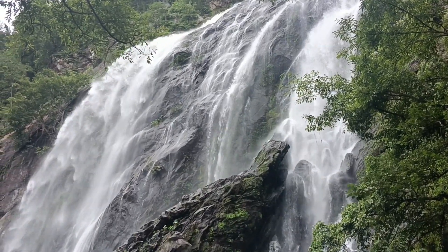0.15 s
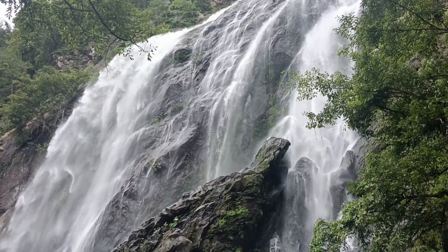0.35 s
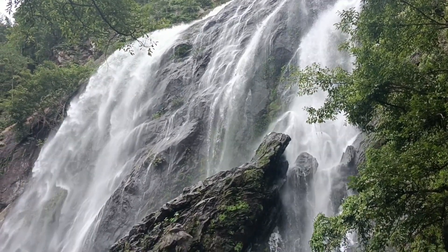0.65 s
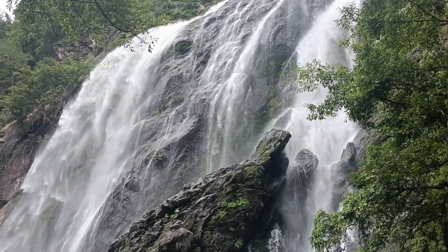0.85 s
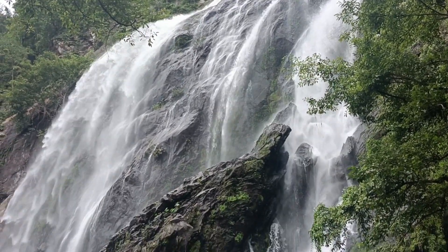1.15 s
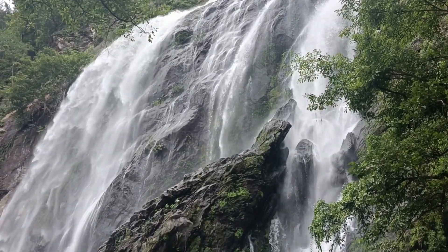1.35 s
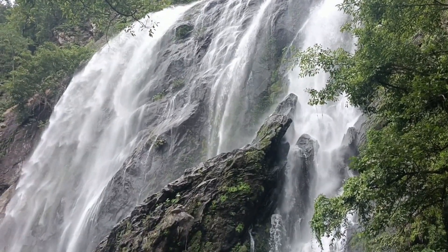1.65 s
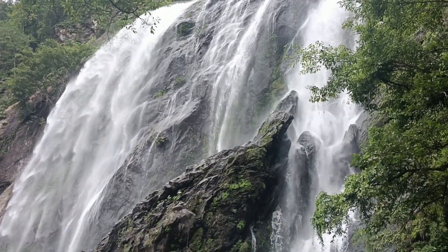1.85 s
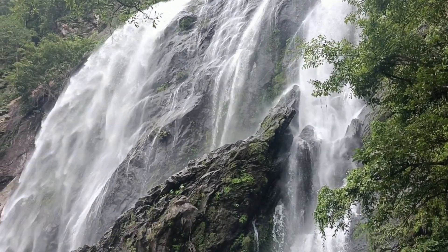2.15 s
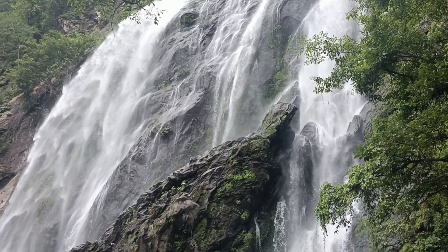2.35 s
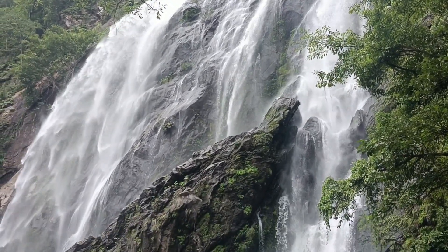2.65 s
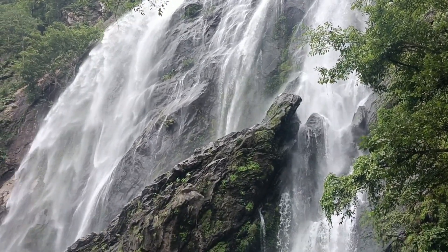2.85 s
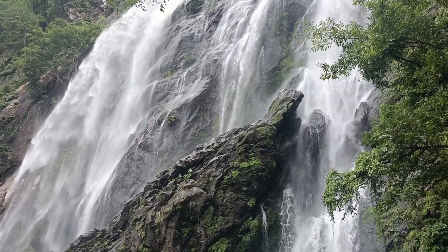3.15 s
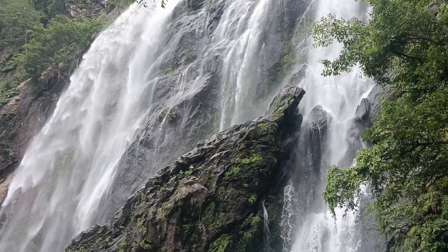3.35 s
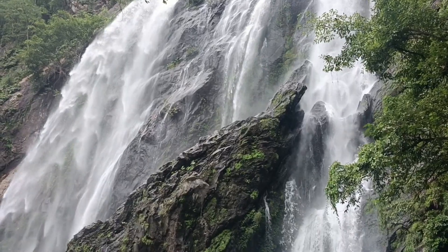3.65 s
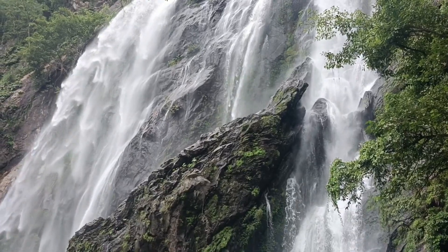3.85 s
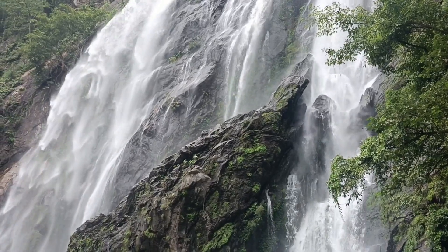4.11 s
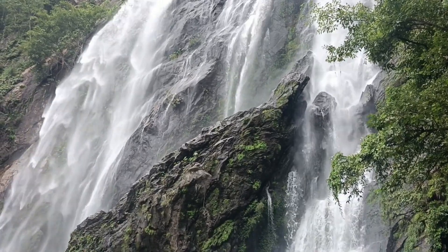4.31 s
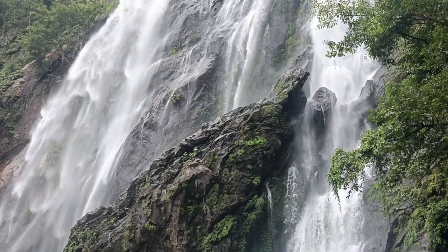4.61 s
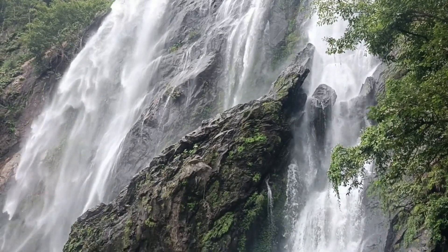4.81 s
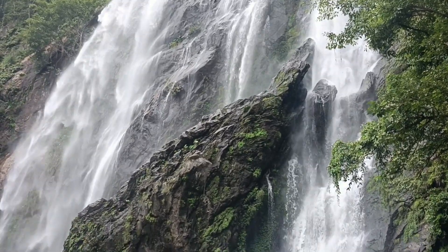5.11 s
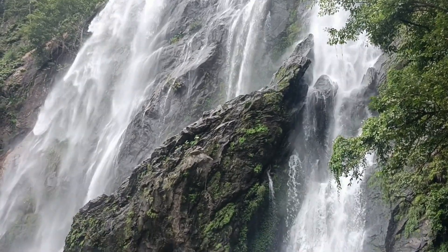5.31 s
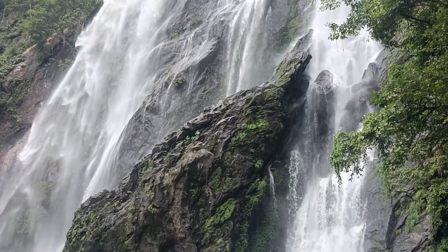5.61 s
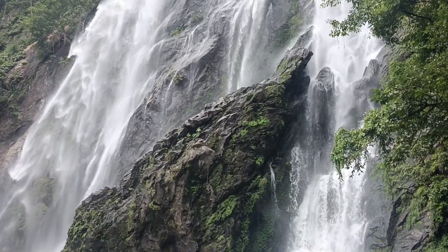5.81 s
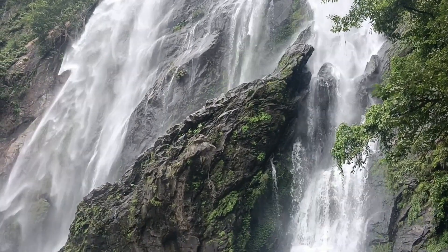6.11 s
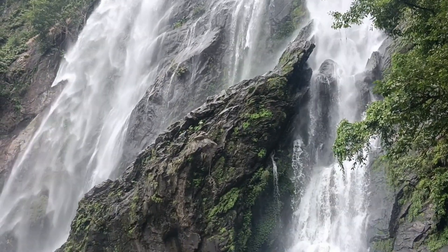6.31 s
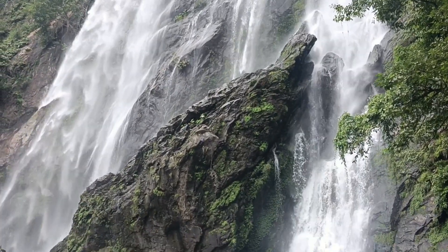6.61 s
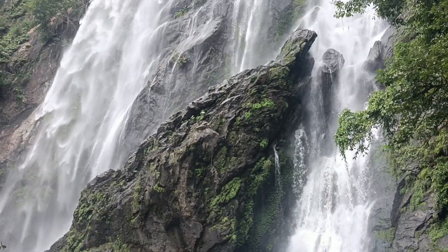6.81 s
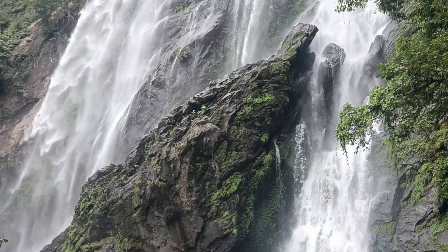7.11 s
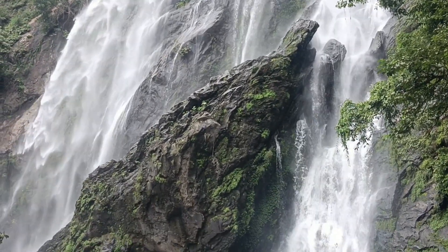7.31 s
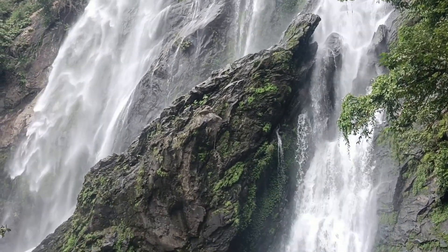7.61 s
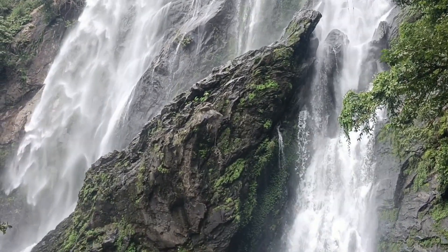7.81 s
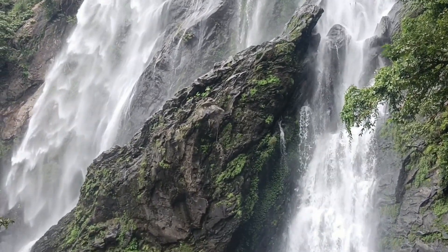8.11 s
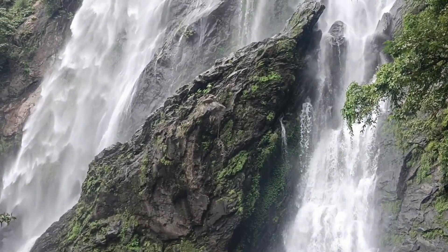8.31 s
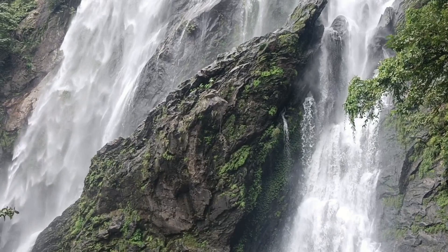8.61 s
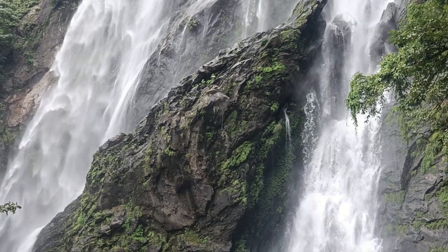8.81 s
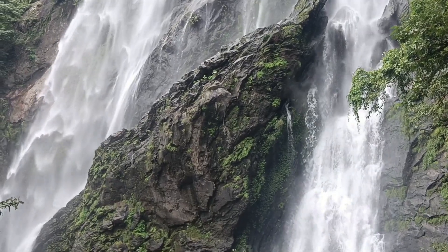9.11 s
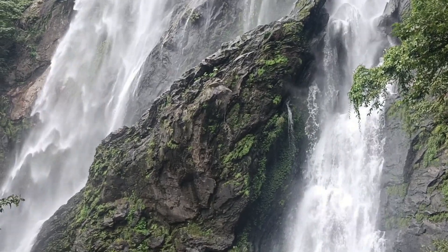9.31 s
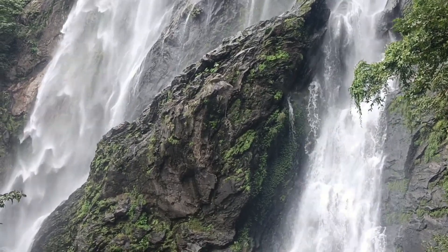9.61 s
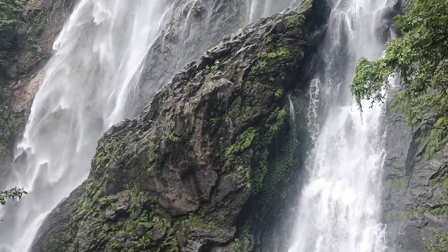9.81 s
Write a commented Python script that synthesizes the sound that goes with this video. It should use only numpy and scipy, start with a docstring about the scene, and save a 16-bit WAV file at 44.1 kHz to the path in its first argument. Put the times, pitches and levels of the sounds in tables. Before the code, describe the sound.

Continuous, slightly grainy hiss and roar of a big waterfall pouring over rock, with light wind thumps on the microphone.

```python
"""A steady rush of countless splashes: a tall waterfall heard from across its pool.
Heavy plunges of water make a low roar whose lower edge swells and sinks; fine spray makes the hiss.
Light gusts thump on the microphone, whose two openings (ports) colour the treble differently.
Its noise suppressor makes the rush sound grainy."""
import sys
import numpy as np
from scipy import signal
from scipy.fft import rfft, irfft, next_fast_len
from scipy.io import wavfile
from scipy.ndimage import uniform_filter1d

SR = 44100
rng = np.random.default_rng(int(sys.argv[2]) if len(sys.argv) > 2 else 0)


def bounce(signal):
    """Save signal as a 16-bit WAV file at the path given by the first command-line argument."""
    frames = np.transpose(np.atleast_2d(signal))
    limited = np.clip(frames, -1, 1)
    pcm = np.round(limited * 32767).astype(np.int16)
    wavfile.write(sys.argv[1], SR, pcm)


N = 438794
SIZE = 32 * next_fast_len(N // 32 + 1, True)   # a little over N samples, for quick spectra
HZ = np.maximum(np.fft.rfftfreq(SIZE, 1 / SR), 1)

# Tone of the water at both ports, up to the low treble: pitch_hz, relative_db
WATER_TONE = [(110, -86.5), (190, -78), (250, -75), (295, -59.5), (330, -58), (390, -66.5), (490, -59.5),
              (570, -58), (650, -59), (760, -64.5), (930, -61.5), (1100, -65.5), (1300, -62.5)]


def from_db(db):
    """Turn decibels into a gain."""
    return 10 ** (np.asarray(db) / 20)


def centre_one(pair):
    """Scale a stereo pair so that the average of its two sides has level (rms) 1."""
    return pair / np.sqrt(np.mean(pair.mean(axis=0) ** 2))


def colour(points):
    """A gain for every pitch in HZ, from rows of pitch_hz, level_db."""
    hz, db = np.transpose(points)
    return from_db(np.interp(np.log(HZ), np.log(hz), db))


def drift(rate_hz, size=N):
    """A slow random wander of typical size 1, made by smoothing noise twice."""
    decay = np.exp(-2 * np.pi * rate_hz * 64 / SR)
    noise = rng.standard_normal(SIZE // 64 + 1000)
    slow = signal.lfilter([1], [1, -2 * decay, decay * decay], noise)[1000:]
    slow /= np.sqrt(np.mean(slow ** 2))
    return np.interp(np.linspace(0, len(slow) - 1, size), np.arange(len(slow)), slow)


def arch(start_s, length_s):
    """A smooth rise from 0 to 1 and back."""
    return np.sin(np.pi * np.clip((np.arange(N) / SR - start_s) / length_s, 0, 1))


def noise_suppressor(sound):
    """In each short frame, pitches weaker than their running average go down and stronger ones go up."""
    hop, pad = 441, 592   # samples; a new frame starts every 10 ms
    contrast, spared_hz = 0.37, 296   # strength of the grain; the bass gets none
    memory_frames, carry_over = 35, 0.28
    padded = np.pad(sound, ((0, 0), (pad, 3 * hop)), "reflect")
    frames = np.lib.stride_tricks.sliding_window_view(padded, 2 * hop, axis=1)[:, ::hop]
    spectra = rfft(frames)
    power = np.abs(spectra) ** 2 + 1e-20
    recent = signal.lfilter([1 - carry_over], [1, -carry_over], power, axis=1)
    average = uniform_filter1d(power, memory_frames, axis=1)
    hz = np.fft.rfftfreq(2 * hop, 1 / SR)
    gain = (recent / average) ** (contrast * np.clip(hz / spared_hz - 1, 0, 1))
    gain *= np.sqrt(power.mean(axis=1) / (power * gain ** 2).mean(axis=1))[:, None]   # keep mean power
    fade = np.hanning(2 * hop + 1)[:-1] ** 1.104   # dips a little where two frames cross
    faded = irfft(spectra * gain, 2 * hop) * fade
    joined = faded[:, 1:, :hop] + faded[:, :-1, hop:]
    return joined.reshape(2, -1)[:, pad - hop:pad - hop + N]


def wind(alike, calm_db):
    """Air presses on both ports nearly alike: a faint rumble, and puffs that push firmly."""
    # Puffs of wind that thump on the ports: start_s, length_s, level_db
    gusts = [(0.129, 0.047, -61), (0.185, 0.037, -60), (0.237, 0.055, -58), (0.497, 0.055, -54),
             (0.666, 0.039, -57), (0.977, 0.029, -63), (1.265, 0.059, -63), (1.638, 0.041, -61),
             (1.682, 0.043, -62), (3.018, 0.037, -58), (3.356, 0.031, -61), (4.174, 0.063, -59),
             (4.354, 0.051, -60), (4.455, 0.062, -58), (5.112, 0.051, -60), (5.437, 0.043, -62),
             (5.697, 0.137, -58), (5.846, 0.041, -62), (6.601, 0.091, -57), (6.702, 0.096, -55),
             (6.808, 0.061, -55), (7.105, 0.035, -58), (7.147, 0.037, -64), (7.185, 0.147, -61),
             (7.433, 0.17, -54), (7.622, 0.035, -59), (7.726, 0.081, -52), (8.321, 0.091, -53),
             (8.578, 0.19, -58), (9.029, 0.033, -66), (9.113, 0.043, -62), (9.486, 0.29, -57)]
    # Deep tone of the wind: pitch_hz, relative_db
    gust_tone = [(18, -6), (35, -10), (56, 5.5), (85, -6.5), (130, -4.5), (250, -56)]
    mid, side = irfft(rfft(rng.standard_normal((2, N)), SIZE) * colour(gust_tone), SIZE)[:, :N]
    pair = np.sqrt(1 + alike) * mid + np.sqrt(1 - alike) * side * [[1], [-1]]
    pair *= from_db([[.5], [-.5]])   # a little louder on the left
    calm = from_db(calm_db) * centre_one(pair * from_db(0.5 * drift(17)))
    span = int(0.03 * SR)   # evening out the level over 30 ms makes the push firm
    firm = pair / np.sqrt(uniform_filter1d(uniform_filter1d(mid ** 2, span), span))
    puffs = sum(from_db(db + 1) * arch(start_s, length_s) for start_s, length_s, db in gusts)
    return calm + puffs * centre_one(firm)


def spray(level_db, from_hz, full_hz):
    """Fine drops, too many to tell apart, hiss above the roar; each port hears its own drops."""
    # How the left port colours the treble: pitch_hz, relative_db
    left_port = [(1300, -62), (1480, -64), (1750, -61.5), (1900, -58.5), (2070, -60.5), (2300, -59),
                 (2750, -60.5), (3500, -59.5), (3800, -61.5), (4050, -63), (4400, -65.5), (5400, -61),
                 (6800, -66), (8000, -75), (8900, -79.5), (9300, -83), (9750, -74), (10600, -70.5),
                 (10800, -64.5), (12000, -70), (15000, -84.5)]
    # How the right port colours the treble: pitch_hz, relative_db
    right_port = [(1300, -63.5), (1500, -64.5), (1880, -62), (2070, -62), (2350, -61.3), (2800, -63),
                  (3600, -63.3), (4250, -67), (5300, -62.5), (6800, -70), (8500, -73), (9300, -81.5),
                  (9600, -75), (10100, -90), (10900, -79.5), (12200, -77), (13500, -79), (15000, -89)]
    ports = np.array([colour(WATER_TONE[:-1] + port) for port in (left_port, right_port)])
    rise = np.clip(np.log(HZ / from_hz) / np.log(full_hz / from_hz), 0, 1)
    drops = rfft(rng.standard_normal((2, SIZE))) * ports * np.sin(np.pi / 2 * rise) ** 2
    return from_db(level_db - 0.05 * drift(25)) * centre_one(irfft(drops, SIZE)[:, :N])


def brief_swells(calm_db, edge_s):
    """The roar's low edge drops and comes back: a gain that rises from 1, holds and falls again."""
    # Brief swells in the low part of the roar, on top of the calm level: start_s, length_s, level_db
    low_swells = [(0.455, 0.21, -51), (1.0, 0.06, -52), (2.67, 0.04, -60), (2.86, 0.032, -56),
                  (3.109, 0.11, -52), (3.8, 0.25, -53), (5.502, 0.07, -49.5), (7.94, 0.039, -50)]
    t, power = np.arange(N) / SR, 1
    for start_s, length_s, db in low_swells:
        corners = start_s + np.array([-edge_s, 0, length_s, length_s + edge_s])
        power += (from_db(db - calm_db) * np.interp(t, corners, [0, 1, 1, 0])) ** 2
    return np.sqrt(power)


def lulls():
    """The lowest roar thins out now and then: a gain that dips smoothly below 1."""
    # Brief dips in the low roar: start_s, length_s, deepest_db
    dips = [(0.197, 0.1, -5), (0.8, 0.08, -4), (1.3, 0.17, -8), (2.74, 0.08, -6), (4.72, 0.29, -6),
            (7.82, 0.07, -6), (8.45, 0.11, -1), (9.15, 0.33, -6), (9.762, 0.15, -8)]
    return from_db(sum(db * arch(start_s, length_s) for start_s, length_s, db in dips))


def roar_layer(plunges, low_hz, high_hz, bands, shared, wander_hz, patchy_db):
    """Both sides carry much the same low roar, drifting in and out of step, so it sounds wide."""
    size = SIZE // 16   # low sound needs only every 16th sample
    bins = size // 2 + 1
    place = np.log(HZ[:bins] / low_hz) / np.log(high_hz / low_hz) * bands - .5
    pair = np.zeros((2, size))
    for band in range(bands):
        common, separate = plunges[:, :bins] * np.cos(np.pi / 2 * np.clip(place - band, -1, 1)) ** 2
        slip_radians = 3.98 * drift(wander_hz, size)
        left, quarter_cycle_late, own = irfft([common, -1j * common, separate], size)
        slipped = left * np.cos(slip_radians) + quarter_cycle_late * np.sin(slip_radians)
        right = np.sqrt(shared) * slipped + np.sqrt(1 - shared) * own
        pair += from_db(patchy_db * drift(6.3, size)) * np.array([left, right])
    return centre_one(irfft(rfft(pair), SIZE)[:, :N]) * from_db([[0], [0.6]])   # right a little louder


def roar(bottom_db, rumble_db, swell_db, swell_hz):
    """Water plunges into the pool: four layers of low noise, the lower ones swelling and sinking."""
    # Base levels of the two higher layers of the roar: time_s, upper_db, deep_db
    levels = [(0, -39.5, -51.5), (0.6, -38.5, -47.5), (1.3, -39.5, -53), (2.2, -41, -48.5),
              (3, -40.5, -52.5), (3.6, -39.5, -50.5), (4, -38.5, -48), (5.2, -42, -47.5), (6.2, -39, -53),
              (7.2, -38, -49.5), (7.65, -38, -46), (8.2, -39, -48), (8.42, -37.5, -55), (8.5, -39, -55),
              (8.66, -37, -54), (8.75, -39.5, -53), (9.0, -38, -45.5), (9.35, -40.5, -55), (9.65, -39, -44),
              (9.95, -39.5, -50)]
    time_s, *columns = np.transpose(levels)
    upper_db, deep_db = [np.interp(np.arange(N) / SR, time_s, column) for column in columns]
    plunges = rfft(rng.standard_normal((2, SIZE))) * colour(WATER_TONE)
    rumble = roar_layer(plunges, 75, 175, bands=3, shared=0.68, wander_hz=6.2, patchy_db=3.5)
    bottom = roar_layer(plunges, 169, 270, bands=3, shared=0.7, wander_hz=2.7, patchy_db=0)
    deep = roar_layer(plunges, 244.4, 371, bands=4, shared=1, wander_hz=4.6, patchy_db=2)
    upper = roar_layer(plunges, 358, 902, bands=6, shared=0.67, wander_hz=4.2, patchy_db=0.3)
    lift, lull = brief_swells(bottom_db, edge_s=0.04), lulls()
    deep *= from_db(deep_db + 1.7 * drift(2.7)) * lift ** 0.2 * lull ** 0.6   # follows both only partly
    bottom *= from_db(bottom_db + swell_db * drift(swell_hz)) * lift * lull
    rumble *= from_db(rumble_db + swell_db * drift(swell_hz)) * lull
    return rumble + bottom + deep + from_db(upper_db) * upper


def scene():
    """The waterfall's roar and spray, with light wind on the microphone."""
    water = roar(bottom_db=-62, rumble_db=-67.5, swell_db=2.5, swell_hz=3.1)
    water += spray(level_db=-27, from_hz=483, full_hz=1166)
    return water + wind(alike=0.85, calm_db=-70)


def record(dry):
    """The microphone's suppressor makes the rush grainy, then the highest treble is cut steeply."""
    cutoff_hz = 15150
    treble_cut = signal.ellip(14, .2, 90, cutoff_hz, fs=SR, output="sos")
    return signal.sosfilt(treble_cut, noise_suppressor(dry))


dry = scene()
out = record(dry)
bounce(out)
```